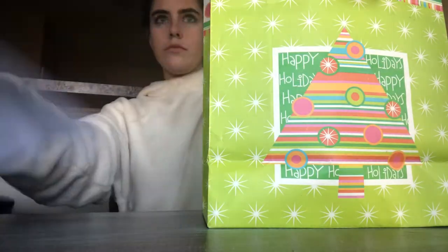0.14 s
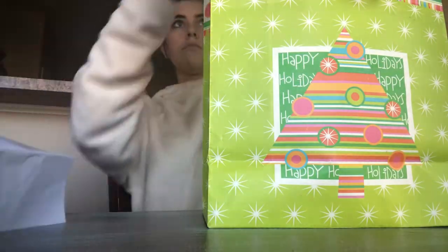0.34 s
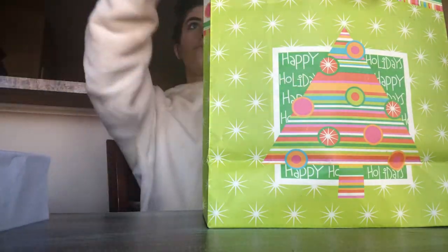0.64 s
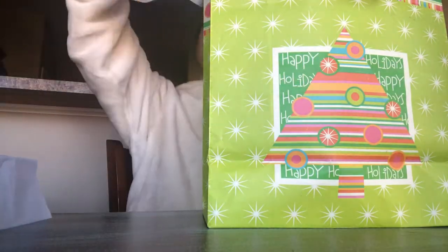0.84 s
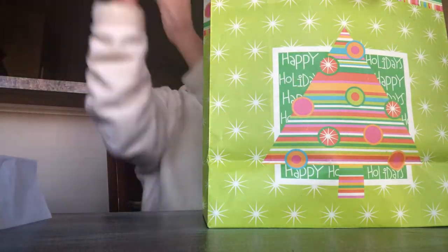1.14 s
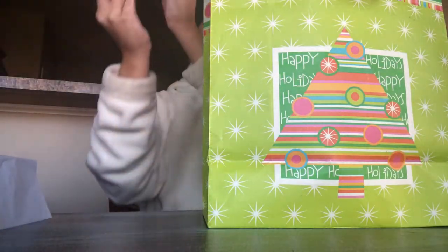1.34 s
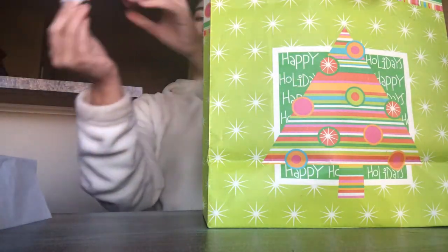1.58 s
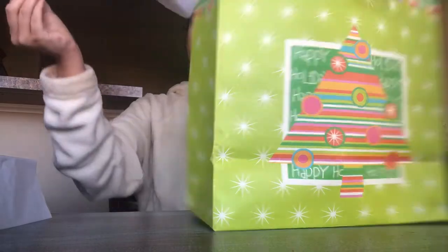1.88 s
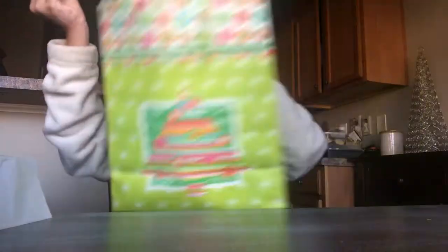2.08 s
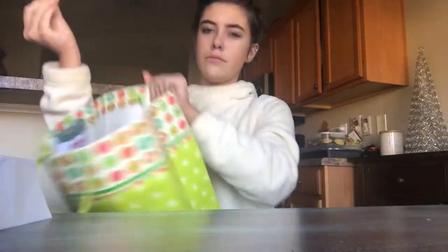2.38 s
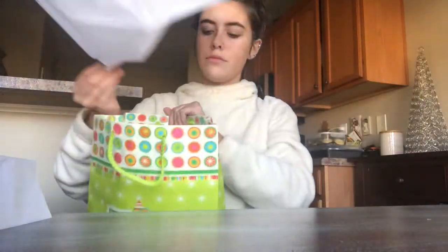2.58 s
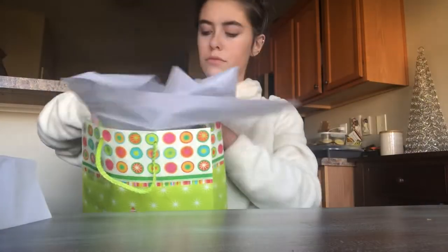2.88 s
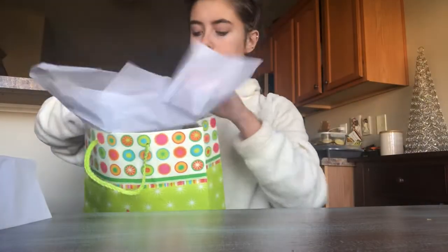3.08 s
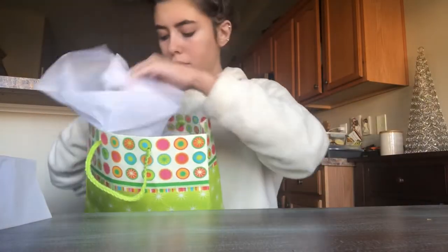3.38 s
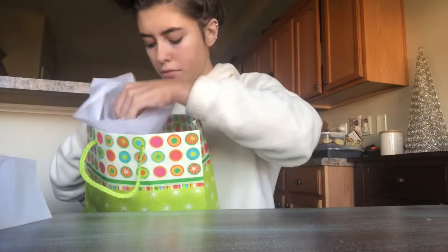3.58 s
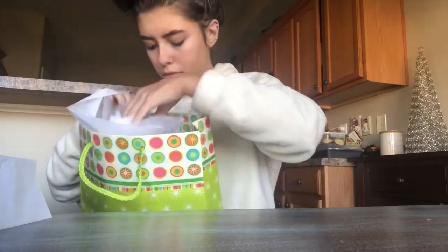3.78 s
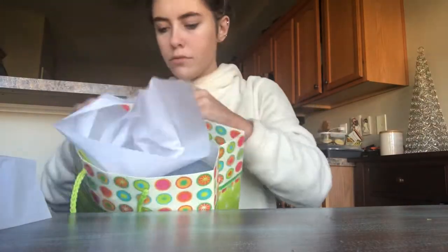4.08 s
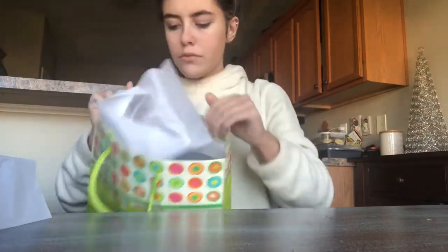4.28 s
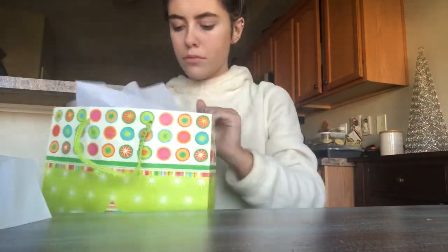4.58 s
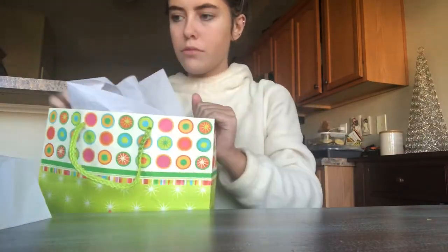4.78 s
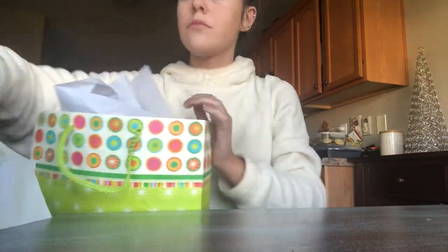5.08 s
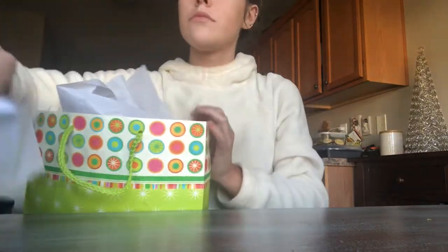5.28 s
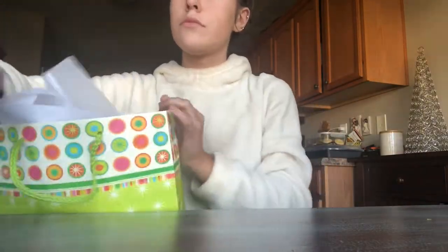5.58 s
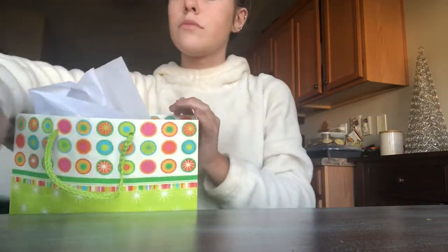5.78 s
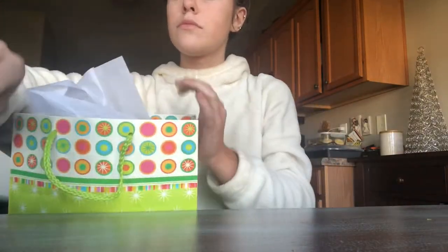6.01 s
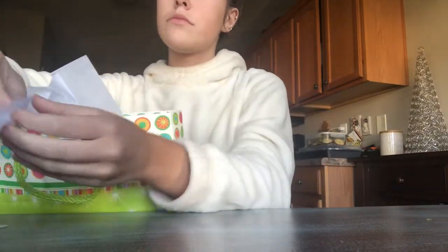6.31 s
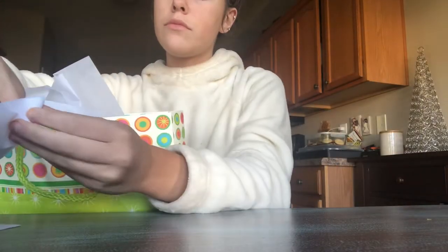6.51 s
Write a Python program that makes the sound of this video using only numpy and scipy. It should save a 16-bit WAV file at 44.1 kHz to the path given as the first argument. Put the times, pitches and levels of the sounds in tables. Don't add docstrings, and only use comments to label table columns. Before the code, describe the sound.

In a quiet small kitchen, close to a phone microphone, thin tissue paper crinkles from the start, a bright irregular patter with sharp little ticks up to about 1.6 s, over light bag rustle. It dips, then from 1.85 to 2.25 s the stiff paper bag is grabbed and turned: a dense cluster of hard, dry snaps with a hollow rustle, strongest near 2.2. A few smaller crackles follow until 2.7. From 2.75 to 3.9 s tissue is pushed into the bag, a fuller, continuous swishing crinkle with few snaps. At 3.9 s comes the loudest sharp pop, then irregular bag snaps from 4.0 to 4.55. It quietens to sparse ticks, until another flurry of pops and rustle at 5.3-5.7 s. Isolated light crackles continue, with a crisp tissue tick near 6.3, then almost only faint steady room hush by 6.5. Short room reflections throughout.

```python
import sys
import numpy as np
from scipy import signal
from scipy.fft import rfft, irfft
from scipy.io import wavfile
from scipy.ndimage import uniform_filter1d

SR = 44100
rng = np.random.default_rng(int(sys.argv[2]) if len(sys.argv) > 2 else 0)


def pcm_store(signal):
    levels = np.round(np.clip(np.atleast_2d(signal), -1, 1) * 32767)
    wavfile.write(sys.argv[1], SR, levels.astype(np.int16).T)


def ratio(d):
    e = np.asarray(d, float) / 20
    return 10 ** e


N = 293265

# (time [s], bright creases [dB], broad creases [dB])
TISSUE_LEVELS = [(0.0, -41.5, -54), (0.05, -38.5, -45.5), (0.22, -50, -52.5), (0.44, -46.5, -57),
                 (0.61, -37.5, -56), (0.8, -42, -63), (1.0, -49, -63), (1.18, -45, -62), (1.37, -47.5, -57),
                 (1.67, -51.5, -59), (1.87, -59.5, -62), (1.94, -45.5, -58), (2.05, -50, -47),
                 (2.09, -64, -65), (2.22, -56, -48), (2.43, -66, -70), (2.52, -47.5, -52), (2.63, -59, -62),
                 (2.76, -42, -43.5), (2.87, -40.5, -45), (2.93, -42, -46), (3.41, -41.5, -44),
                 (3.7, -47, -47), (3.96, -43, -50), (4.43, -63.5, -66), (4.52, -54, -51),
                 (4.76, -59.5, -64), (4.98, -73, -67), (5.17, -55.5, -54), (5.31, -55, -58),
                 (5.48, -44, -47), (5.52, -47, -46.5), (5.63, -59, -59.5), (5.78, -68, -69),
                 (5.91, -58, -60), (6.22, -49.5, -51.5), (6.48, -75, -84), (6.65, -69, -80)]
# (time [s], wall [dB], air inside [dB], table rumble [dB])
BAG_LEVELS = [(0.0, -46, -45.5, -60), (0.13, -45.5, -54, -55.5), (0.31, -55, -61, -62),
              (0.52, -48.5, -55, -81), (0.8, -49, -52.5, -78), (0.98, -57, -66, -80),
              (1.17, -47.5, -57, -79), (1.35, -50.5, -57, -81), (1.63, -53, -61.5, -80),
              (1.8, -55.5, -60, -61), (1.93, -48, -45, -60), (2.02, -31, -34.5, -58),
              (2.07, -43, -47.5, -59), (2.2, -49, -50, -76), (2.5, -64, -59, -77), (2.8, -42, -50, -72),
              (2.89, -42.5, -49.5, -79), (3.26, -43.5, -50, -69), (3.48, -45.5, -50.5, -77),
              (3.74, -45.5, -53.5, -71), (3.93, -41.5, -46.5, -68), (4.09, -53, -55.5, -72),
              (4.3, -43, -45, -69), (4.41, -53, -46.5, -67), (4.48, -47, -48, -70), (4.61, -58, -51.5, -68),
              (4.7, -57.5, -64, -70), (4.91, -54, -63, -82), (5.18, -54, -56, -69), (5.37, -51, -54, -70),
              (5.52, -46, -54, -69), (5.56, -45.5, -46, -67), (5.68, -54, -63, -78),
              (5.83, -60, -66.5, -72), (6.24, -55, -58, -76), (6.33, -50, -61, -72), (6.48, -73, -81, -84),
              (6.65, -71, -73, -78)]
# (time [s], peak [dB], edge [dB], air [dB], boom [dB], time to ring down by 60 dB [s])
BUCKLES = [(0.073, -33, 6.5, 2, -1, 0.041), (0.215, -28, 3, -7, -8, 0.034),
           (0.758, -41.5, -16, -6, -20, 0.05), (0.877, -41.5, -14, -1, -19, 0.05),
           (1.019, -50, -15, -3, -22, 0.04), (1.073, -42.5, -10, -5, -30, 0.043),
           (1.118, -58, -13, 2, -20, 0.039), (1.159, -36, -19, 2, -14, 0.066),
           (1.322, -40.5, -18, -1, -13, 0.033), (1.589, -51, -13, -3, -24, 0.043),
           (1.632, -40, -7, -1, -21, 0.046), (1.702, -45, -14, 0, -20, 0.055),
           (1.767, -43.5, -33, -18, 4.5, 0.038), (1.783, -35.5, -22, -25, -7, 0.05),
           (1.835, -34, -20, -20, -12, 0.045), (1.856, -24, -22, -7, -5.5, 0.044),
           (1.886, -22, -15, -12, -17, 0.046), (1.898, -18, -9, -8, -10, 0.047),
           (1.921, -16.5, -4, -10, -25, 0.058), (1.954, -16.5, 1, -14, -15.5, 0.057),
           (1.99, -16, -6, -6, -16, 0.046), (2.019, -21, -1, -18, -13, 0.05),
           (2.02, -19, -20, -31, -18, 0.038), (2.049, -24.5, -7, -25, -19, 0.042),
           (2.143, -21.5, -22, -21, -16.5, 0.085), (2.169, -11.5, 0, -10, -36, 0.045),
           (2.227, -13.5, -2, -20, -25, 0.038), (2.312, -34.5, -27, -32, -18, 0.044),
           (2.311, -32, -20, -29, -25, 0.059), (2.368, -41, -13, -17, -27, 0.05),
           (2.393, -36, -10, -11, -18, 0.074), (2.42, -20.5, 5.5, -2.5, -22, 0.05),
           (2.486, -35.5, -3, -1, -3, 0.035), (2.52, -31.5, 2.5, -7, -23, 0.039),
           (2.56, -27.5, 3.5, -25, -33, 0.037), (2.591, -40, -14, -10, -9, 0.05),
           (2.62, -38.5, -9, -16, -16, 0.046), (2.703, -33, 6, 5.5, -23, 0.053),
           (3.082, -32.5, 6, 10, -14, 0.05), (3.151, -41, -6, -1, -16, 0.05),
           (3.267, -32, -1, 3, -14, 0.067), (3.886, -39, -4, -8, -3, 0.086),
           (3.917, -13, -13, -16, -24, 0.028), (3.917, -6.5, -9.5, -17, -13, 0.046),
           (4.018, -27.5, 4, -10, -27, 0.038), (4.085, -30.5, -6, -13, -9, 0.048),
           (4.105, -23.5, -2, -15, -29, 0.044), (4.172, -29, -25, -24, -29, 0.038),
           (4.223, -22.5, -13, -22, -26, 0.042), (4.271, -17.5, -7, -11, -24.5, 0.046),
           (4.288, -18.5, 4.5, -5, -29.5, 0.032), (4.338, -15.5, -1, 0, -35, 0.042),
           (4.385, -26.5, -6, -9, -23, 0.047), (4.451, -21.5, -2.5, -40, -19, 0.035),
           (4.483, -29, -27, -27, -22, 0.05), (4.511, -32.5, -21, -26, -7, 0.05),
           (4.527, -23, -9, -15, -13.5, 0.062), (4.616, -27.5, -26, -28, -11, 0.039),
           (4.646, -33.5, -10, -22, -8, 0.035), (4.785, -35.5, -4, -6, -12, 0.044),
           (4.869, -34, 2, -30, -16, 0.039), (4.943, -39, -1, -8, -6.5, 0.067),
           (5.167, -37.5, -7, 1, -20, 0.046), (5.323, -26, -4, -21, -18, 0.034),
           (5.34, -15.5, -5, -28, -21, 0.032), (5.369, -16.5, 1, -21, -21, 0.042),
           (5.375, -17.5, -1, -26, -25, 0.03), (5.417, -27, -12, -8, -10, 0.036),
           (5.456, -24.5, -9, -18, -9.5, 0.036), (5.534, -22.5, -11, -11, -16, 0.044),
           (5.558, -28, -5, -5, -19, 0.05), (5.6, -35.5, 1, -1, -16, 0.05),
           (5.679, -21, -7, -25, -17.5, 0.039), (5.68, -27.5, -25, -34, -12, 0.057),
           (5.851, -51.5, 5, -1, -18, 0.041), (5.927, -34.5, -14, -25, -15, 0.039),
           (6.046, -48, -13, -18, -16, 0.039), (6.044, -26.5, -1, -6, -20, 0.038),
           (6.148, -29, -2.5, -7, -16, 0.043), (6.242, -56, -4, -7, -17, 0.044),
           (6.292, -36.5, 16, 4, -25, 0.032), (6.36, -40, 5, 8, -31, 0.05),
           (6.379, -37, 12.5, 5, -25, 0.039), (6.464, -53.5, -1, -8, -19, 0.05),
           (6.563, -49, -1, -10, -17, 0.046)]
# (time [s], peak [dB], broad part relative to it [dB])
SHARP_CREASES = [(0.217, -20, -18), (0.3646, -33, -19), (0.384, -20.5, -19), (0.475, -24.5, -19),
                 (0.554, -44, -19), (0.5746, -31, -23), (0.6627, -17, -25), (0.876, -24, -25),
                 (0.993, -28, -24), (1.074, -25.5, -24), (1.1568, -24, -18), (1.198, -22, -19),
                 (1.2306, -17.5, -19), (1.323, -38, -20), (1.3265, -26, -24), (1.3573, -36, -26),
                 (1.3763, -32, -20), (1.4395, -23, -20), (1.6217, -43, -19), (1.6343, -21.5, -16),
                 (1.7005, -32, -15), (1.8272, -41, -17), (1.8967, -29, 11), (1.921, -12, 15.5),
                 (1.954, -28, -3), (1.988, -26, -3), (2.1703, -17, 7), (2.2285, -19, -5), (2.252, -21, 1),
                 (2.3885, -39.5, 15), (2.42, -34, 10), (2.4204, -25, -4), (2.4877, -29, -3),
                 (2.7033, -26, 3), (3.0796, -24, -3), (3.1487, -29, -12), (3.897, -41.5, 10),
                 (3.898, -18, -12.5), (3.915, -17, 7), (3.916, -39.5, 18.5), (4.066, -36, -12),
                 (4.271, -38, 1), (4.2872, -25, 3), (4.339, -16, 13.5), (4.9586, -34, -3),
                 (5.071, -33, -15), (5.186, -32, -23), (5.3402, -34, 16.5), (5.373, -32, 14),
                 (5.374, -24, 6), (5.402, -19, -16), (5.5014, -28, -11), (5.617, -30, -12),
                 (5.6782, -40, 13.5), (5.8002, -35, -8), (5.8511, -36, -18), (6.0368, -34, 10.5),
                 (6.2926, -14, 0), (6.3792, -16, -20), (6.559, -38.5, 9.5)]
# (frequency [Hz], width [Hz], level [dB])
WALL_RINGS = [(248, 30, -16), (555, 22, 3), (960, 210, 12.5), (1240, 49, 3.5), (2060, 740, 2.5),
              (2680, 71, -14), (3080, 110, -2.5), (4340, 230, -24)]
SNAP_COLOUR_HZ = [70, 400, 1100, 2600, 5700, 11500, 16500]
# (frequency [Hz], level per Hz [dB])
HUSH_COLOUR = [(24, -48), (40, -16.5), (118, -1), (542, 3), (3060, -11), (7930, 1.5), (16000, -20.5)]


def unit(x):
    return x / np.sqrt(np.mean(x ** 2))


def curves(table):
    times, *columns = np.transpose(table)
    t = np.arange(N) / SR
    return [ratio(np.interp(t, times, column)) for column in columns]


def band(x, lo_hz, hi_hz, order=2):
    sos = signal.butter(order, [lo_hz, hi_hz], "bandpass", fs=SR, output="sos")
    return signal.sosfilt(sos, x)


def add(out, start_s, sound):
    i = int(start_s * SR)
    out[i:i + len(sound)] += sound[:N - i]


def wander(rate_hz):
    hold = int(SR / rate_hz)
    steps = np.repeat(rng.standard_normal(N // hold + 1), hold)
    return uniform_filter1d(steps, hold // 2 + 1)[:N]


def hand_grip():
    return ratio(3.2 * wander(25) + 1.77 * wander(90))


def patter(rate_hz, spread_db, blur_db, grip):
    happens = rng.random(N) < rate_hz / SR
    size_db = np.minimum(spread_db * rng.exponential(size=N), 22)
    direction = np.sign(rng.standard_normal(N))
    clicks = happens * ratio(size_db) * direction
    blur = ratio(blur_db) * rng.standard_normal(N)
    return (unit(clicks) + blur) * grip


def tissue_patter(grip):
    bright_gain, broad_gain = curves(TISSUE_LEVELS)
    creases = patter(3000, 2.7, 0.5, grip)
    bright = unit(band(creases, 7800, 14650))
    broad = unit(band(creases, 4100, 6310))
    return bright_gain * bright + broad_gain * broad


def bag_rustle(grip):
    wall_gain, cavity_gain, table_gain = curves(BAG_LEVELS)
    creases = patter(900, 3.6, -1.9, grip)
    rung = creases.copy()
    for hz, width_hz, db in WALL_RINGS:
        rung += ratio(db - 5) * band(creases, hz - width_hz / 2, hz + width_hz / 2, order=1)
    wall = unit(band(rung, 966, 3530))
    cavity = unit(band(rung, 287, 900))
    rumble = unit(band(patter(300, 3.6, 2.6, grip), 92, 250))
    return wall_gain * wall + cavity_gain * cavity + table_gain * rumble


def hush():
    hz = np.maximum(np.fft.rfftfreq(N, 1 / SR), 1)
    point_hz, point_db = np.transpose(HUSH_COLOUR)
    colour = ratio(np.interp(np.log(hz), np.log(point_hz), point_db))
    noise = irfft(rfft(rng.standard_normal(N)) * colour, N)
    return ratio(-59.5) * unit(noise)


def room(x):
    t60_s, level_db = 0.29, -9.5
    t = np.arange(int(0.4 * SR)) / SR
    noise = rng.standard_normal((2, len(t))) * (t > 0.004)
    low = band(noise[0], 91, 1770, order=1) * ratio(-60 * t / t60_s)
    high = band(noise[1], 2740, 14200, order=1) * ratio(-60 * t / (0.57 * t60_s))
    tail = low + 0.84 * high
    tail = ratio(level_db) * tail / np.sqrt(np.sum(tail ** 2))
    return signal.fftconvolve(x, tail)[:N]


def buckle_snaps():
    count = 56
    out = np.zeros(N)
    t = np.arange(6000) / SR
    slot = np.arange(count)[:, None]
    for start_s, peak_db, edge_db, air_db, boom_db, t60_s in BUCKLES:
        place, turn, size = rng.random((3, count, 1))
        hz = 90 * (16000 / 90) ** ((slot + place) / count)
        colour_db = [boom_db - 21.5, boom_db, -1.5, -0.5, edge_db, air_db, air_db - 12.5]
        tone_db = np.interp(np.log(hz), np.log(SNAP_COLOUR_HZ), colour_db) + 8.8 * (size - 1)
        since = np.maximum(t - 0.002165 * np.sqrt(1000 / hz), 0)
        ring_s = t60_s * (1000 / hz) ** 0.84 + 0.0048
        swell = 1 - np.exp(-since * hz * 2.2)
        fade = np.exp(-np.log(1000) * since / ring_s)
        tones = ratio(tone_db) * swell * fade * np.sin(2 * np.pi * (hz * since + turn))
        add(out, start_s - 0.0012, ratio(peak_db - 6.5) * tones.sum(axis=0))
    return out


def tissue_ticks():
    out = np.zeros(N)
    t = np.arange(400) / SR
    for start_s, peak_db, broad_db in SHARP_CREASES:
        burst = rng.standard_normal(len(t)) * np.exp(-t / 0.00086)
        bright = band(burst, 6760, 15900)
        broad = band(burst, 2100, 7900)
        tick = bright / abs(bright).max() + ratio(broad_db - 5) * broad / abs(broad).max()
        add(out, start_s, ratio(peak_db - 1) * tick)
    return out


def scene():
    grip = hand_grip()
    bag_grip = grip * ratio(1.14 * wander(40))
    paper = tissue_patter(grip) + bag_rustle(bag_grip) + buckle_snaps() + tissue_ticks()
    return (paper + room(paper) + hush())[None]


def band_limit(x):
    return signal.sosfilt(signal.butter(12, 17000, fs=SR, output="sos"), x)


def record(dry):
    bass_cut = signal.butter(2, 90, "highpass", fs=SR, output="sos")
    top_cut = signal.ellip(8, 0.2, 50, 15900, fs=SR, output="sos")
    mix = signal.sosfilt(top_cut, signal.sosfilt(bass_cut, dry))
    return band_limit(mix)


dry = scene()
out = record(dry)
pcm_store(out)
```